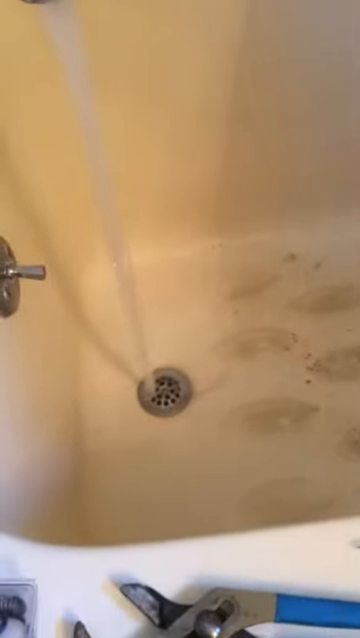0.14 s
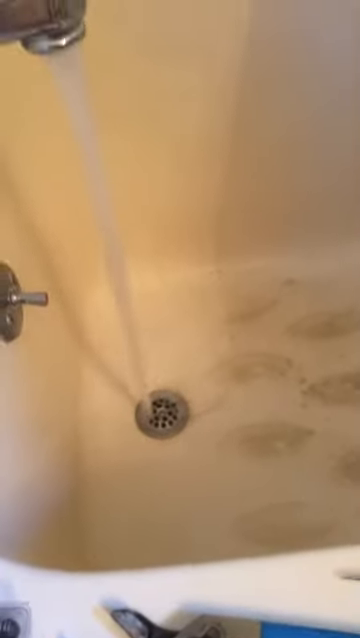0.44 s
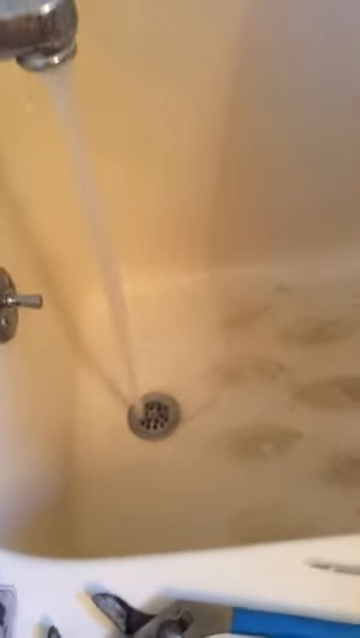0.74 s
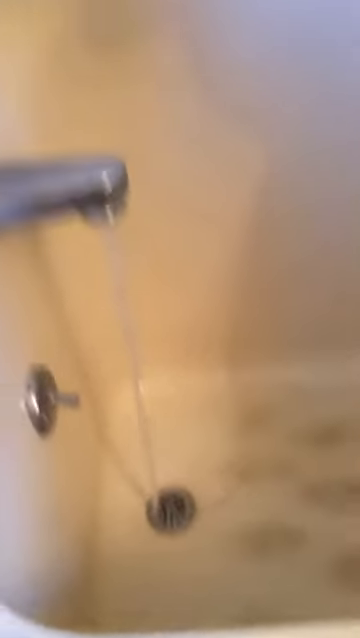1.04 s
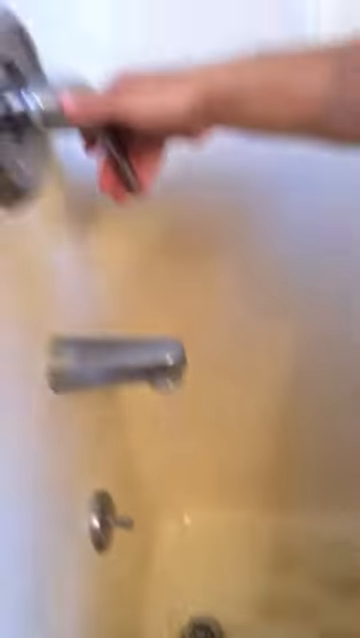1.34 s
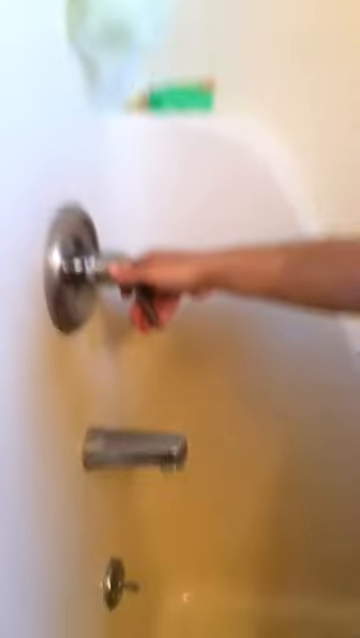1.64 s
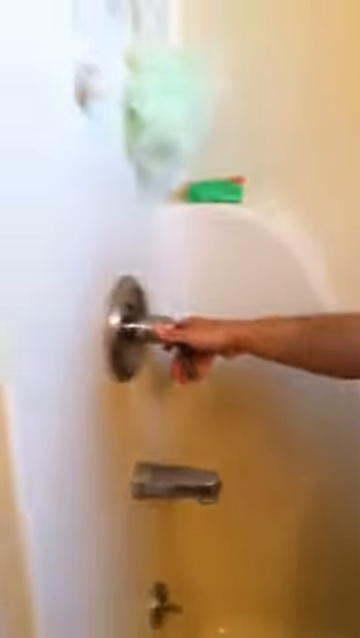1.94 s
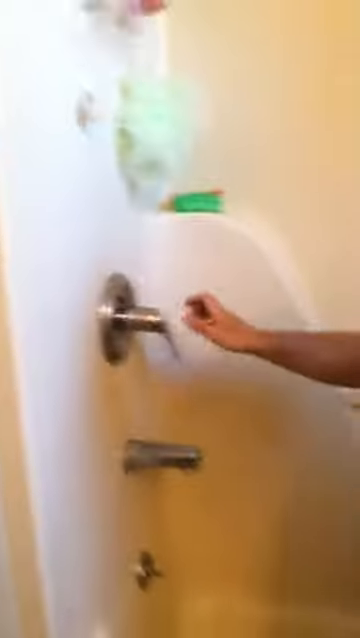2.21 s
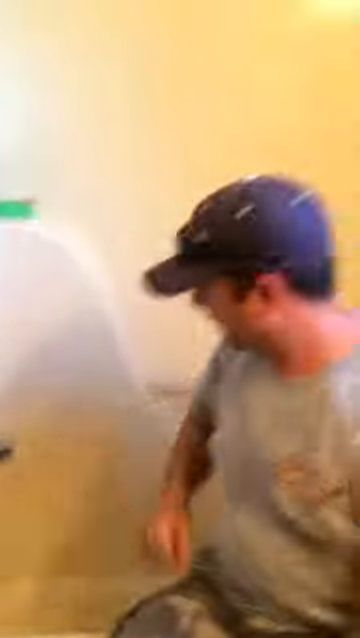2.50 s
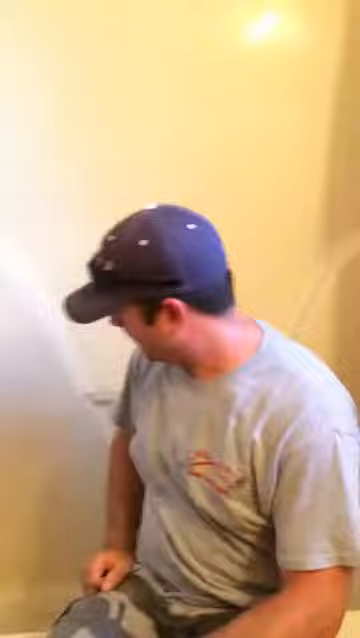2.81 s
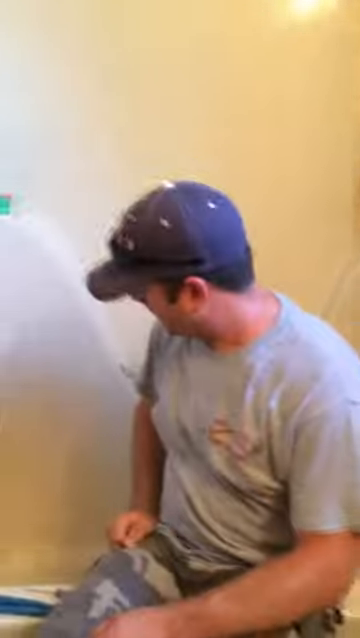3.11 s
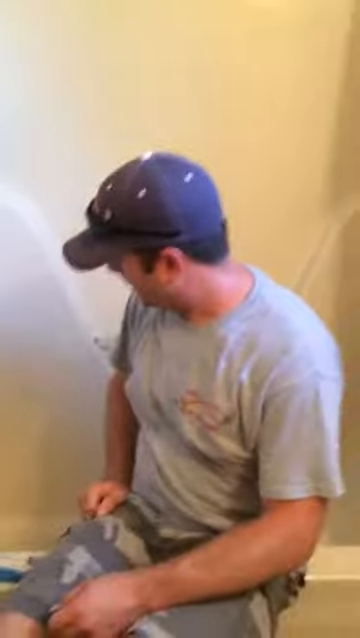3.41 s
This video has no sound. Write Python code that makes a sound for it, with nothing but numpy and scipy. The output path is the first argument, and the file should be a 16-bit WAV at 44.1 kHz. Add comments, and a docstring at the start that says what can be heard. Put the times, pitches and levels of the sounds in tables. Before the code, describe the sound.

Bathtub tap water splatters on the drain, thins to a trickle and stops; faint drips, soft bump.

```python
"""Bathtub tap closing

A stream splatters on the drain of an empty tub: swarms of pitched bubble bursts over shaped noise.
The drain gulps with larger bubbles; noise through modes drums the tub floor over a rumble and a low hum.
The tap is closed, the stream thins to a trickle and last drops tick and plink in the hard-walled alcove.
Someone sitting on the rim bumps the tub once, a stumble of three contacts: decaying wall modes and noise.
"""
import sys
import numpy as np
from scipy import signal
from scipy.fft import rfft, irfft, next_fast_len
from scipy.io import wavfile
from scipy.ndimage import map_coordinates

SR = 44100
rng = np.random.default_rng(int(sys.argv[2]) if len(sys.argv) > 2 else 0)


def to_wav(sig):
    """Store sig (one row per channel, or 1-D mono) as 16-bit WAV at the path in sys.argv[1].

    Samples outside -1..1 are clipped; the rate is SR.
    """
    pcm = np.clip(np.atleast_2d(sig), -1, 1) * 32767
    pcm = np.round(pcm).astype(np.int16)
    wavfile.write(sys.argv[1], SR, pcm.T)  # frames by channels


N = 156555  # samples

# All dB in the tables are relative, ahead of mixing gains and echo.
# spray of the stream (time [s], level [dB])
SPRAY_LEVEL = [(0,-28),(.42,-26),(.65,-27.5),(.95,-26),(1.05,-29),(1.42,-33),(1.54,-39.5),(1.76,-47.5),(1.9,-49),(2.15,-54),(2.55,-60.5),(3.4,-64.5)]
# water in the drain (time [s], level [dB])
DRAIN_LEVEL = [(0,-35),(1.1,-44),(1.45,-36),(1.56,-38.5),(1.66,-32.5),(1.93,-52.5),(2.55,-62),(2.95,-56.5),(3.2,-81)]
# drumming of the tub floor, before surges (time [s], level [dB])
DRUM_LEVEL = [(0,-41),(.7,-42.5),(1.15,-44.5),(1.6,-45.5),(1.95,-55.5),(2.45,-66),(3.5,-74.5)]
# low rumble, before surges (time [s], level [dB])
RUMBLE_LEVEL = [(0,-40),(.3,-52),(.55,-41),(.7,-49.5),(1.15,-47.5),(1.45,-67),(3.5,-71)]
# swells of the drumming (centre time [s], added level [dB])
SURGES = [(.39,5.5),(.83,7),(1.07,8.5),(1.47,4),(2.05,9),(2.141,13.5),(2.341,12.5)]
SURGE_WIDTH_S = 0.035  # centre to 1/e of the added dB
# steady hum that swells as the tap closes (time [s], level [dB])
HUM_LEVEL = [(0,-52),(1.35,-51.5),(1.55,-43.5),(1.85,-54.5),(2.2,-76.5)]
HUM_HZ = 203
# small bubbles bursting in the splash (time [s], level [dB], pitch [Hz])
SNAPS = [(.0105,-12.5,6640),(.0568,-15,6330),(.131,-10,8300),(.1538,-12,7100),(.1715,-16,7700),(.2,-18.5,7500),(.2728,-7.5,6360),(.3341,-11,7400),(.4085,-8.5,7200),(.411,-7.5,6740),(.4405,-15,6770),(.523,-8.5,6900),(.5755,-13.5,5670),(.6555,-13,7200),(.6937,-10,7050),(.8195,-13,6300),(1.1915,-14.5,6040),(1.231,-16.5,6230),(1.285,-17,7250),(1.3204,-21.5,5400),(1.39,-21.5,6800),(1.414,-19,6300),(1.461,-18.5,6940),(1.5822,-20,6200),(1.6115,-20.5,4400),(1.6729,-19.5,8020),(1.82,-31,7400),(1.8578,-26,10700),(1.8837,-28.5,7650)]
# large bubbles bursting in the drain (time [s], level [dB], pitch [Hz])
GULPS = [(.0717,-17,2200),(.1715,-18,3100),(.2712,-13,2300),(.298,-16.5,2370),(.5435,-17,1700),(.5955,-12,1700),(.9852,-12.5,1300),(1.0325,-17,2300),(1.172,-20,2400),(1.1915,-18,3100),(1.2955,-20.5,2700),(1.365,-22,1050),(1.386,-18.5,1400),(1.388,-11.5,2750),(1.414,-18,2100),(1.432,-19,1240),(1.6114,-14.5,2200)]
# last drops (time [s], level [dB], starting pitch [Hz], decay to 1/e [cycles])
DRIPS = [(1.777,-38,1930,9.9),(1.791,-43,4900,4),(1.828,-41,5500,4),(1.96,-48,4020,4),(1.977,-26.5,10800,1.2),(2.061,-29.5,6560,1.2),(2.124,-44,1390,0.92),(2.16,-42.5,2490,1.6),(2.381,-39,6350,5.3),(2.427,-33.5,7550,1.1),(2.43,-45.5,13200,5.9),(2.572,-44,4960,3.9),(2.84,-48,5800,2.5),(2.993,-30.5,8120,1),(3.162,-48,4980,2),(3.229,-41,7870,3.8),(3.363,-45,9450,1.5),(3.384,-50,3470,6.7)]
# bumps against the tub (time [s], ring level [dB], clack level [dB])
BUMPS = [(2.791,-34.5,-46.5),(2.823,-37.5,-54.5),(2.863,-54,-63)]
# modes of the tub floor under the stream (centre [Hz], width [Hz], gain [dB])
FLOOR_MODES = [(138.6,8.1,1),(170.1,9.4,-3.5),(203.9,7,0),(305,190,-18.5),(449,6.8,-9.5)]
# modes of the tub wall (frequency [Hz], level [dB], t60 [s])
WALL_MODES = [(152,-2,.06),(192,11.5,0.062),(244,1,0.11),(330.6,-2,0.19)]
# noise spectra (frequency [Hz], density [dB per Hz])
SPRAY_COLOUR = [(300,-28.5),(1000,-4),(3000,-8),(4800,-4),(7000,-4),(9000,-7),(11500,-7),(15500,-11)]
DRAIN_COLOUR = [(250,-20.5),(450,0),(720,-1.5),(1000,-1.5),(1700,-3),(2300,5.5),(3500,-5),(6000,-11.5),(12000,-23)]
RUMBLE_COLOUR = [(20,-15.5),(38,-18.5),(52,-9.5),(80,-3.5),(105,-4.5),(160,-15),(400,-54.5)]
THUD_COLOUR = [(60,-30),(250,10.5),(550,-1.5),(1000,-12),(1500,-5),(2400,-4.5),(3400,-21),(9000,-36)]
AIR_COLOUR = [(25,-12),(167,-2.5),(475,-6.5),(1720,-23),(3500,-25),(15000,-35.5)]
# ring of the alcove (frequency [Hz], t60 [s])
ALCOVE_T60 = [(200,0.55),(2000,0.19),(7000,0.28),(14000,0.29)]
ALCOVE_BUILD_S = 0.004  # the echoes take this long to gather
# the listening point backs away from the drain (time [s], direct sound [dB])
NEARNESS = [(1.2,-2),(2.2,-14)]
TOP_HZ = 15250  # band limit


def amp(db):
    """Decibels to gain."""
    return 10 ** (np.asarray(db) / 20)


def unit(x):
    """Scale to rms 1."""
    return x / np.sqrt(np.mean(x ** 2) + 1e-20)


def along(points, hz):
    """Interpolate (Hz, value) points on a log-frequency axis."""
    f, v = np.transpose(points)
    return np.interp(np.log(hz + 1), np.log(f + 1), v)


def level(rows):
    """Gain per sample from (s, dB) rows."""
    return amp(np.interp(np.arange(N) / SR, *np.transpose(rows)))


def wobble(rate_hz):
    """Smooth random curve, rate_hz knots a second."""
    knots = rng.standard_normal(int(N * rate_hz / SR) + 4)
    return map_coordinates(knots, [np.arange(N) * rate_hz / SR])


def filtered(x, response):
    """Multiply the spectrum of x by a response of frequency."""
    m = next_fast_len(N + SR // 2)
    hz = np.fft.rfftfreq(m, 1 / SR)
    return irfft(rfft(x, m) * response(hz), m)[:N]


def noise(colour):
    """Coloured noise of rms 1."""
    return unit(filtered(rng.standard_normal(N), lambda hz: amp(along(colour, hz))))


def add(track, start_s, sound):
    """Mix a sound into the track at start_s."""
    part = track[max(0, round(start_s * SR)):][:len(sound)]
    part += sound[:len(part)]


def alcove(x, wet_db, direct=1):
    """Direct sound plus the ring of the hard walls: noise decaying at a rate set by frequency."""
    hz, t, z = signal.stft(rng.standard_normal(SR // 2), SR, nperseg=256)
    decay = amp(-60 * t / along(ALCOVE_T60, hz)[:, None])
    tail = signal.istft(z * decay, SR, nperseg=256)[1]
    tail *= np.minimum(np.arange(len(tail)) / SR / ALCOVE_BUILD_S, 1) ** 2
    out = amp(wet_db) * signal.fftconvolve(x, tail / np.linalg.norm(tail))
    out[:len(x)] += direct * x
    return out


def chirp(t, hz, cycles, rise):
    """A bursting bubble swells and fades; its pitch climbs through hz as the cavity opens."""
    u = np.minimum(t * hz / cycles, 1)
    swell = np.abs(np.sin(np.pi * u ** .7)) ** 1.5
    # integral of a pitch hz * exp(rise * (u - .4))
    turns = cycles * (np.exp(rise * (u - .4)) - np.exp(-rise * .4)) / rise
    return swell * np.sin(2 * np.pi * turns)


def bubbles(count, hz, spread, cycles, rise, size_db, size):
    """Random swarm of bursting bubbles, many small and few large, rms 1; size in samples."""
    when, loud, high = rng.random((3, count, 1))
    pitch_hz = np.minimum(hz * np.exp(spread * (2 * high - 1)), TOP_HZ)
    strength = amp(-size_db * np.log(loud + .03))
    grains = strength * chirp(np.arange(size) / SR, pitch_hz, cycles, rise)
    index = (when * N).astype(int) + np.arange(size)
    return unit(np.bincount(index.ravel(), grains.ravel(), N)[:N])


def spray():
    """The stream breaks into clumps of tiny bubbles over a hiss; as it thins, single drops gain weight."""
    crackle = bubbles(count=1700, hz=7406, spread=0.26, cycles=7, rise=.7, size_db=4.5, size=128)
    ticks = bubbles(count=2400, hz=6500, spread=0.86, cycles=2.24, rise=0.21, size_db=4.5, size=128)
    patter = bubbles(count=420, hz=9400, spread=0.8, cycles=1.3, rise=0.42, size_db=3.5, size=128)
    clumps = amp(4.4 * np.tanh(wobble(75)) + 2.8 * np.tanh(wobble(280)))
    water = amp(-5) * crackle + amp(-10.5) * ticks + amp(-5.5) * noise(SPRAY_COLOUR)
    flow = level(SPRAY_LEVEL)
    thinning = np.sqrt(np.minimum(flow.max() / flow, 10))
    stream = (water * clumps + amp(-15) * thinning * patter) * flow
    return alcove(stream, wet_db=-8.0, direct=level(NEARNESS))[:N]


def drain():
    """Larger bubbles churn in the strainer, in short clusters."""
    churn = bubbles(count=900, hz=2183, spread=0.7, cycles=7, rise=0.92, size_db=5.0, size=600)
    clusters = amp(3.0 * wobble(44.78))
    water = (amp(-5.0) * churn + amp(-5.5) * noise(DRAIN_COLOUR)) * clusters
    return alcove(water * level(DRAIN_LEVEL), wet_db=-7.0, direct=level(NEARNESS))[:N]


def floor_response(hz):
    """Resonances of the thin tub floor, summed with alternating sign."""
    total = 0
    for k, (centre_hz, width_hz, db) in enumerate(FLOOR_MODES):
        damping = 1j * hz * width_hz
        total = total + (-1) ** k * amp(db) * damping / (centre_hz ** 2 - hz ** 2 + damping)
    return total


def tub_floor():
    """The stream drums on the thin floor in uneven swells, over a deep rumble."""
    t = np.arange(N) / SR
    surge_db = sum(db * np.exp(-((t - s) / SURGE_WIDTH_S) ** 2) for s, db in SURGES)
    drum = unit(filtered(rng.standard_normal(N), floor_response)) * level(DRUM_LEVEL) * amp(surge_db)
    rumble_swell = amp(0.49 * surge_db + 3 * np.tanh(wobble(18)))
    return drum + noise(RUMBLE_COLOUR) * level(RUMBLE_LEVEL) * rumble_swell


def hum(waver_hz):
    """Narrow low tone, wavering in pitch and level while the water runs, probably from the pipes."""
    phase = 2 * np.pi * np.cumsum(HUM_HZ + waver_hz * wobble(14)) / SR
    return unit(np.sin(phase) * amp(2 * wobble(9))) * level(HUM_LEVEL)


def bursts(rows, cycles, rise, splash_db, splash_cycles, wet_db):
    """Single loud bubbles, each in a short splash around its pitch; low ones last longer, far ones echo more."""
    out, t = np.zeros(N), np.arange(SR // 20) / SR
    for s, db, hz in rows:
        edges_hz = [hz * 0.6, min(hz * 1.635, SR * .45)]
        band = signal.butter(2, edges_hz, "band", fs=SR, output="sos")
        u = t * hz / splash_cycles
        splash = unit(signal.sosfilt(band, rng.standard_normal(len(t)))) * u * np.exp(1 - u)
        burst = chirp(t, hz, cycles, rise) + amp(splash_db) * splash
        far_db = -np.interp(s, *np.transpose(NEARNESS))
        add(out, s, amp(db) * alcove(burst, wet_db + far_db))
    return out


def drips(rise, wet_db, tick_db):
    """Each last drop ticks and traps a bubble whose plink glides up a little and rings on faintly."""
    out, t = np.zeros(N), np.arange(SR // 8) / SR
    for s, db, hz, cycles in DRIPS:
        u = t * hz / cycles
        ring = np.exp(-u) + amp(-20) * np.exp(-u / 9)
        attack = 1 - np.exp(-2 * t * hz)
        pitch_hz = hz * (1 + rise * (1 - np.exp(-u / 2)))
        plink = np.sin(2 * np.pi * np.cumsum(pitch_hz) / SR) * ring * attack
        tick = rng.standard_normal(len(t)) * np.exp(-t * hz / 2)
        add(out, s, amp(db) * alcove(plink + amp(tick_db) * tick, wet_db, direct=1.24))
    return out


def knock(thud_t60_s, attack_s, wet_db):
    """A soft, stumbling bump briefly rings the tub wall; its dull clack echoes in the alcove."""
    out, t = np.zeros(N), np.arange(SR // 2) / SR
    ring = sum(amp(db - 60 * t / t60_s) * np.sin(2 * np.pi * hz * t) for hz, db, t60_s in WALL_MODES)
    ring = ring * (1 - np.exp(-t / attack_s))
    for s, ring_db, clack_db in BUMPS:
        clack = noise(THUD_COLOUR)[:len(t)] * amp(clack_db - 60 * t / thud_t60_s)
        add(out, s, amp(ring_db) * ring)
        add(out, s, alcove(clack, wet_db, direct=1))
    return out


def scene():
    """All the water, the hum, the knock and the quiet air of the bathroom."""
    water = spray() + drain() + tub_floor() + hum(waver_hz=4.99)
    snaps = amp(-3.0) * bursts(SNAPS, cycles=12, rise=.7, splash_db=-9, splash_cycles=11, wet_db=-10)
    gulps = amp(-5.5) * bursts(GULPS, cycles=6, rise=.8, splash_db=-7, splash_cycles=2.5, wet_db=-6.5)
    drops = drips(rise=0.0305, wet_db=8, tick_db=-9)
    bump = knock(thud_t60_s=0.061, attack_s=0.0077, wet_db=7.5)
    air = amp(-68.5) * noise(AIR_COLOUR)
    return (water + snaps + gulps + drops + bump + air)[None]


def record(dry):
    """Low-pass: the sound falls away steeply above the band limit."""
    return filtered(dry[0], lambda hz: amp(-60 * np.clip((hz - TOP_HZ) / 600, 0, 2) ** 2))[None]


dry = scene()
out = record(dry)
to_wav(out)
```